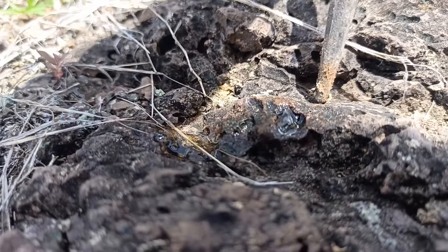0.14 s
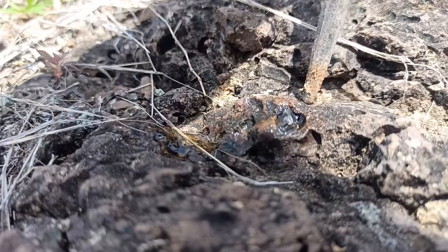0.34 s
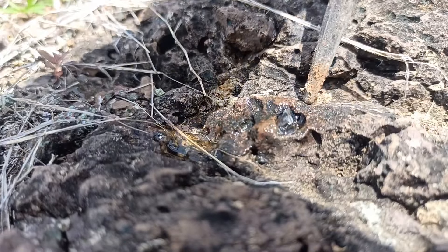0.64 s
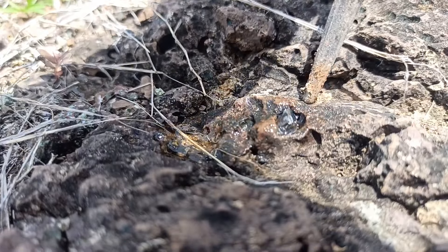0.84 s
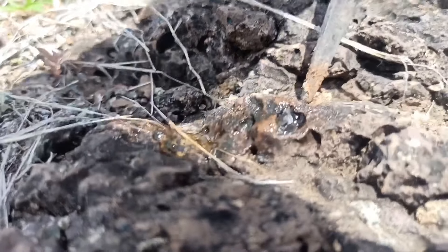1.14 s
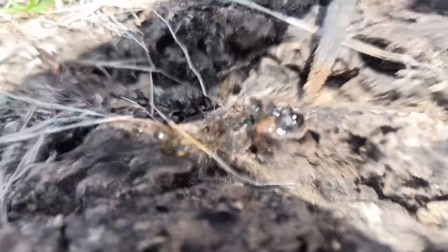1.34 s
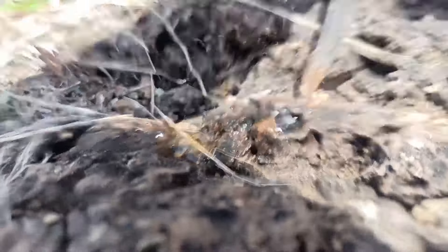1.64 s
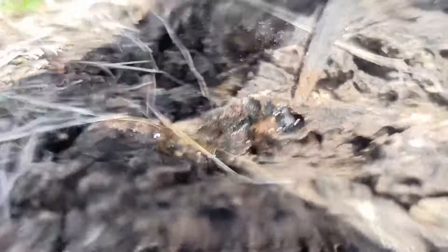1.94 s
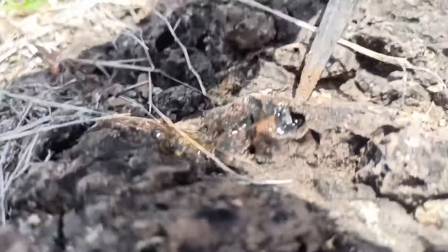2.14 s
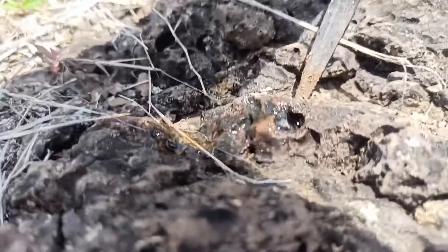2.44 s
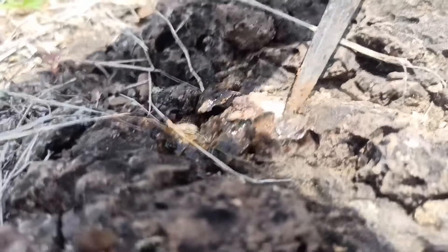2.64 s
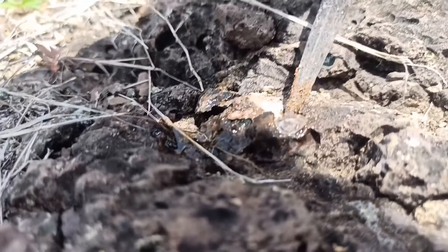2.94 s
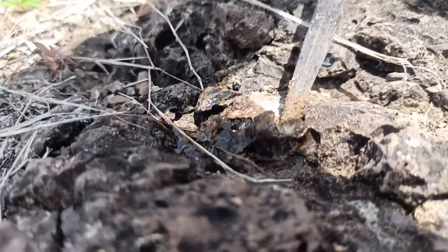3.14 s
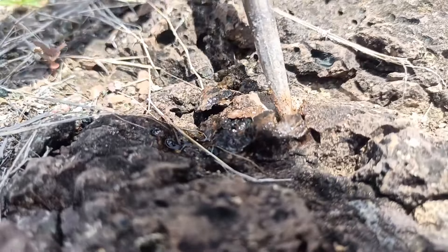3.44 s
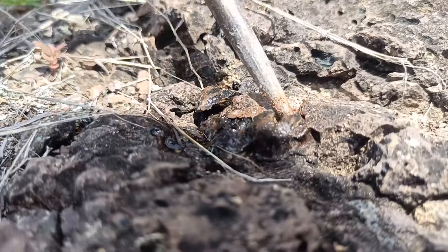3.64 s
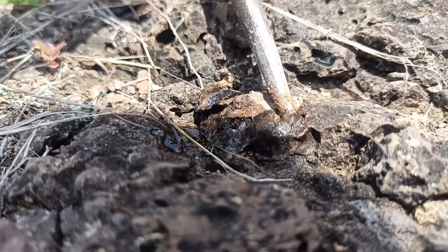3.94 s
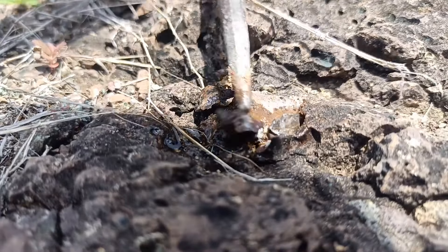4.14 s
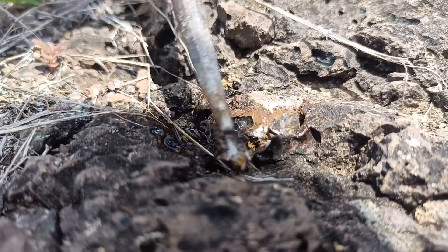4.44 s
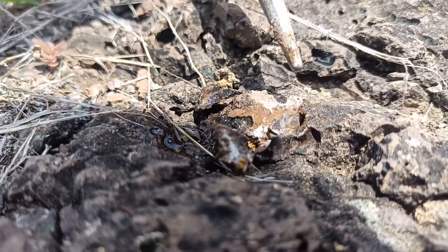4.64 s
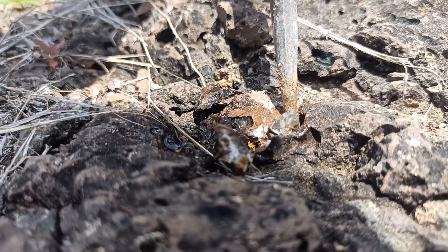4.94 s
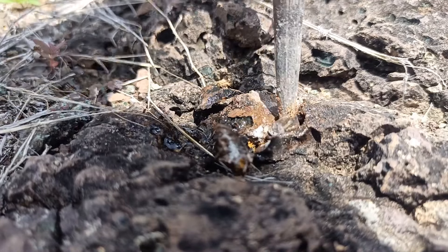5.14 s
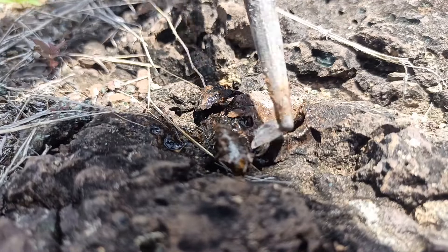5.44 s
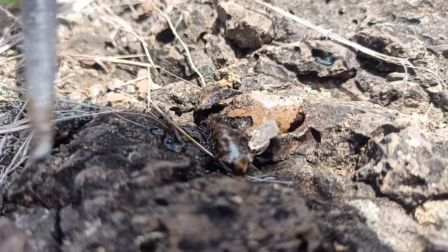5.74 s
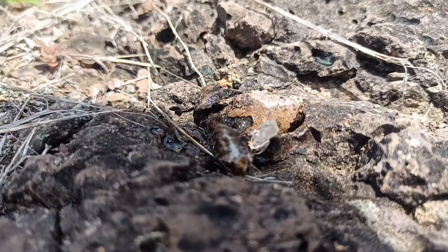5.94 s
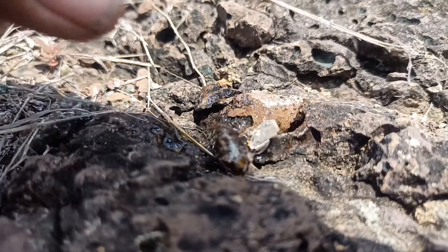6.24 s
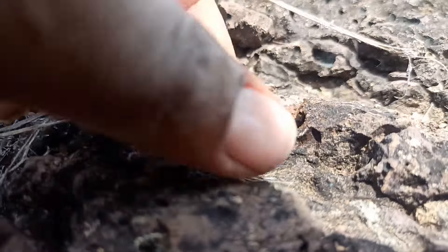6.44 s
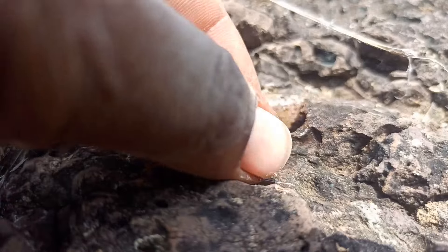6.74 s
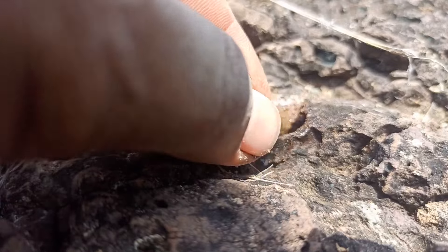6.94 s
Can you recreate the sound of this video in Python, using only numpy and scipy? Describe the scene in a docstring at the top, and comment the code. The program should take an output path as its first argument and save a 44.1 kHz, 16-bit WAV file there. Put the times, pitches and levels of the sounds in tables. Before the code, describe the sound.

Outdoors, spaced hard blows crack crusty rock, then a metal tip scrapes and rings under rumbling wind, ending in gritty finger rubbing.

```python
"""Outdoors: wind buffets mostly the left port over a breeze in dry grass; a steel pick touches volcanic rock.
From 1 s seven sharp blows drive it in: porous rock cracks and thuds, chips tick; a faint hum swells and dies.
From 4 s the tip pries, scrapes and probes, the shaft ringing; a flake clinks; then fingers rub loose grit.
Shaped noise makes wind, crunch and rubbing; damped modes make rock and steel; short pings make crumbs.
Peaks over a ceiling duck the gain for a moment, and the input clips."""
import sys
import numpy as np
from scipy import signal
from scipy.fft import rfft, irfft
from scipy.io import wavfile
from scipy.ndimage import uniform_filter1d, minimum_filter1d

SR = 44100
rng = np.random.default_rng(int(sys.argv[2]) if len(sys.argv) > 2 else 0)


def generate_wav(sig):
    """Save sig (samples, or channels by samples) to the path in sys.argv[1] as 16-bit PCM at SR."""
    pcm = np.round(np.clip(np.atleast_2d(sig).T, -1, 1) * 32767).astype(np.int16)
    wavfile.write(sys.argv[1], SR, pcm)


N = 312669
TIME = np.arange(N) / SR


def undb(db):
    """Decibels to gain."""
    return 10 ** (np.asarray(db) / 20)


def unit(x):
    """Scale to rms 1."""
    return x / np.sqrt(np.mean(x ** 2))


def curve(rows):
    """Each column of a table, joined by lines in time."""
    s, *columns = np.transpose(rows)
    return [np.interp(TIME, s, c) for c in columns]


def response(points, size):
    """Minimum-phase spectrum with the given (f/Hz, level/dB) outline, by folding the cepstrum."""
    hz, db = np.transpose(points)
    f = np.fft.rfftfreq(size, 1 / SR)
    outline_db = np.interp(np.log(f + 1), np.log(hz), db)
    cepstrum = irfft(np.log(undb(outline_db)))
    cepstrum[1:size // 2] *= 2
    cepstrum[size // 2 + 1:] = 0
    return np.exp(rfft(cepstrum))


def through(x, taps):
    """Convolve every channel with an impulse response."""
    return signal.oaconvolve(np.atleast_2d(x), np.atleast_2d(taps), axes=1)[:, :N]


def colour(x, points):
    """Give white sound a spectrum and keep its power."""
    taps = irfft(response(points, size=4096))
    return through(x, taps / np.linalg.norm(taps))


def highpass(x, hz):
    """Second-order low cut."""
    return signal.sosfilt(signal.butter(2, hz, "highpass", fs=SR, output="sos"), x)


def ring(modes):
    """First 0.25 s of the impulse response of damped modes."""
    t = TIME[:SR // 4]
    return sum(undb(db - 60 * t / t60) * np.sin(2 * np.pi * hz * t) for hz, db, t60 in modes)


def resonate(x, peaks, direct):
    """Resonances, with a share of the sound passing straight through."""
    out = direct * x
    for hz, width_hz, db in peaks:
        out = out + undb(db) * signal.lfilter(*signal.iirpeak(hz, hz / width_hz, SR), x)
    return out


def walk(rate_hz):
    """Smooth random wander of rms 1."""
    k = int(SR / rate_hz)
    steps = np.repeat(rng.standard_normal(N // k + 1), k)[:N]
    return unit(uniform_filter1d(uniform_filter1d(steps, k), k // 2))


def noise(shared):
    """White noise at the two ports, a share of its power common to both."""
    common = np.sqrt(shared) * rng.standard_normal(N)
    return common + np.sqrt(1 - shared) * rng.standard_normal((2, N))


def grains(rate_hz, spread_db, shared):
    """Crunching noise: its level wanders quickly, as tiny fractures differ in size."""
    return unit(noise(shared) * undb(spread_db * np.clip(walk(rate_hz), -2, 2)))


def pan(left_db):
    """Gains of the two channels at constant power, left over right in dB."""
    return unit(undb(np.array([[left_db], [-left_db]]) / 2))


def swell(at_s, rise_s, fall_s):
    """Exponential growth up to a moment and decay after it, cut at 12 time constants."""
    ends_s = np.array([at_s - 12 * rise_s, at_s + 12 * fall_s])
    first, last = np.clip(ends_s * SR, 0, N).astype(int)
    t = TIME[first:last] - at_s
    shape = np.zeros(N)
    shape[first:last] = np.exp(-np.maximum(-t / rise_s, t / fall_s))
    return shape


def strike(at_s, modes, detune, scatter_db, push_s):
    """A Gaussian push on a set of modes; each strike detunes and scatters them at random."""
    chance = rng.standard_normal((len(modes), 2))
    tone = ring([(hz * (1 + detune * a), db + scatter_db * b, t60)
                 for (hz, db, t60), (a, b) in zip(modes, chance)])
    push = np.exp(-.5 * (np.arange(-256, 257) / SR / push_s) ** 2)
    tone = signal.oaconvolve(tone, push / push.sum())
    start = int(at_s * SR) - len(push) // 2
    return np.pad(tone, (start, N))[:N]


# wind on the left port, before trims: t/s, level/dB
WIND = [(0.03, -47.5), (0.12, -30.5), (0.47, -31.5), (1.1, -47.5), (1.58, -44), (1.9, -54), (2.65, -41.5),
        (2.87, -30), (3.22, -50.5), (3.42, -33.5), (3.8, -30), (4.4, -38), (4.95, -28.5), (5.2, -40.5),
        (5.62, -43.5), (6.15, -29.5), (6.75, -21.5), (7.09, -23)]
# hardest single buffets, before trims: t/s, level/dB, rise and fall time constant/s
BUFFETS = [(0.287, -14, 0.0087), (3.295, -11, 0.0049), (3.67, -18, 0.0096), (3.99, -21.5, 0.013),
           (4.302, -15, 0.0032), (4.448, -18.5, 0.0044), (4.583, -22.5, 0.018), (4.63, -14, 0.0051),
           (4.742, -16, 0.0051), (4.784, -20, 0.0098), (5.499, -16, 0.012), (6.185, -9.5, 0.0071),
           (6.718, -10, 0.018), (6.984, -7.5, 0.0043), (7.056, -6, 0.0085)]
# spectra of the rumble and of the eddies: f/Hz, level/dB
WIND_COLOUR = [(20, -26.5), (45, -23), (75, 1), (105, 6.5), (160, -3), (250, -15.5), (400, -34.5),
               (700, -47), (1500, -69.5)]
BUFFET_COLOUR = [(25, -35), (60, -7.5), (110, 3.5), (180, 1.5), (290, -8.5), (450, -24), (800, -49),
                 (1600, -66.5)]


def wind(steady_db=-2, buffet_db=-5, kick_db=-4, flutter_db=7.0, right_db=-17, gust_db=-9):
    """Eddies rumble on the ports; stronger flow reaches higher, and each buffet has one sharp kick."""
    flow_db, = curve(WIND)
    flow = undb(flow_db + flutter_db * np.minimum(walk(60), 1.3))
    buffets, kicks = np.zeros((2, N))
    for s, db, length_s in BUFFETS:
        buffets += undb(db + buffet_db) * swell(s, length_s, length_s)
        kicks[int((s - .003) * SR)] += undb(db + kick_db) * np.sqrt(length_s * SR)
    gusts = undb(gust_db) * flow * undb((flow_db + 34.0) / 3)
    rumble = undb(steady_db) * flow * colour(noise(shared=0.013), WIND_COLOUR)
    turbulence = (buffets + gusts) * grains(rate_hz=290, spread_db=4, shared=0.024)
    left_kicks = kicks * np.array([[1], [0]])
    eddies = colour(turbulence + left_kicks, BUFFET_COLOUR)
    return (rumble + eddies) * undb([[0], [right_db]])


# steady hiss; hiss growing with the wind, relative to the wind
BREEZE_DB, BREEZE_WIND_DB = -59.5, -42.5
# louder rustles of the grass: t/s, level/dB
RUSTLES = [(0.03, -58), (2.75, -60.5), (3.4, -53.5)]
RUSTLE_RISE_S, RUSTLE_FALL_S = 0.054, 0.066
# spectrum of the open air: f/Hz, level/dB
AIR_COLOUR = [(25, 11), (100, 14.5), (250, 19), (500, 11), (900, 4.5), (1800, -0.5), (4000, -1.5),
              (7000, -5.5), (8500, -11.5), (10000, -7.5), (12000, -8), (15500, -8.5)]


def breeze():
    """Dry grass hisses as coloured noise, more in stronger wind, with a few rustles."""
    flow_db, = curve(WIND)
    air = undb(BREEZE_DB) + undb(flow_db + BREEZE_WIND_DB)
    for s, db in RUSTLES:
        air += undb(db) * swell(s, RUSTLE_RISE_S, RUSTLE_FALL_S)
    return air * undb(.5 * walk(7.1)) * colour(noise(shared=0.023), AIR_COLOUR)


# tip catching on the rock: t/s, length/s, grit level/dB, stone knock level/dB, pick ring level/dB
TOUCHES = [(0.348, 0.014, -58, -56, -49.5), (0.38, 0.0065, -57, -28.5, -74),
           (0.535, 0.017, -52.5, -70, -85), (4.079, 0.0082, -36.5, -47, -55),
           (4.097, .009, -41.5, -49, -43), (4.127, 0.024, -46.5, -56, -51.5),
           (4.136, 0.0033, -38.5, -41.5, -57), (4.802, 0.012, -42.5, -39, -50.5),
           (4.818, 0.0062, -38, -62, -50.5), (4.834, 0.0047, -38, -23, -68),
           (5.008, 0.0073, -39.5, -41.5, -50), (5.033, .011, -36.5, -47, -35.5),
           (5.069, 0.018, -42, -38, -76), (5.474, 0.0063, -57.5, -63, -44),
           (5.737, 0.013, -42.5, -34.5, -35.5), (5.903, 0.016, -45, -41, -80),
           (6.009, 0.018, -55, -69.5, -27), (6.046, 0.15, -55, -50, -36.5),
           (6.112, 0.0032, -21, -14, -30.5), (6.136, 0.015, -39.5, -31, -64)]
# each catch skips once and lands again, more softly
SKIP_S, SKIP_DB = 0.0153, -14
# light probing scratches: start t/s, length/s, grit level/dB
PROBING = [(4.182, .07, -62), (4.426, .06, -64.5), (5.146, .3, -58), (6.161, .12, -51)]
SCRATCH_GAP_S, SCRATCH_S, SCRATCH_SCATTER_DB = 0.044, 0.015, 2.5
SCRATCH_STONE_DB, SCRATCH_RING_DB = -4.5, 0.5  # relative to the grit
# small chips and crumbs that tick or snap: t/s, grit level/dB, stone knock level/dB
CHIPS = [(1.397, -31.5, -43.5), (2.001, -31, -57), (2.015, -40, -69), (2.299, -29, -56), (2.643, -41, -70),
         (2.707, -49, -48.5), (2.79, -57, -62), (5.358, -48.5, -66), (6.351, -47, -31), (6.574, -41, -48),
         (6.609, -34, -48), (6.683, -41, -22), (6.848, -44, -19), (6.878, -29, -57), (6.902, -50, -50),
         (6.966, -32.5, -27.5), (6.976, -44, -16), (7.053, -50.5, -29.5)]
CHIP_S = 0.0045


def contacts():
    """Every contact as (t/s, length/s, grit, stone, ring gains): catches and skips, scratches, chips."""
    rows = []
    for s, length_s, *db in TOUCHES:
        rows.append((s, length_s, *undb(db)))
        rows.append((s + SKIP_S, length_s, *undb(db) * undb(SKIP_DB)))
    for start_s, length_s, db in PROBING:
        times = np.arange(start_s, start_s + length_s, SCRATCH_GAP_S)
        for s, (late, size) in zip(times, rng.standard_normal((32, 2))):
            grit_gain = undb(db + SCRATCH_SCATTER_DB * size)
            gains = grit_gain * undb([0, SCRATCH_STONE_DB, SCRATCH_RING_DB])
            rows.append((s + 0.26 * SCRATCH_GAP_S * late, SCRATCH_S, *gains))
    for s, grit_db, stone_db in CHIPS:
        rows.append((s, CHIP_S, undb(grit_db), undb(stone_db), 0))
    return rows


# tip chattering as it scrapes: f/Hz, width/Hz, level/dB
SCRAPE_PEAKS = [(1486, 180, -3.5), (1890, 65, -7.5), (4680, 110, 6)]
# pick ringing freely: f/Hz, level/dB, t60/s
PICK_MODES = [(2648, -24, 0.16), (4833, -12, 0.042), (4706, -7, 0.093), (7330, -5, .03),
              (7337, -8.5, 0.054), (7420, -13.5, 0.14), (10470, -9.5, 0.027), (11950, -18, 0.044),
              (14000, -12, 0.033), (14600, -17, 0.11)]
# spectra of grit and of knocked stone: f/Hz, level/dB
GRIT_COLOUR = [(250, -8.5), (700, -3.5), (1500, 6.5), (3000, 4), (5000, 3.5), (7500, -2), (12000, -7.5),
               (15500, -8.5)]
STONE_COLOUR = [(90, -7), (220, 7), (400, 6.5), (650, -4.5), (1000, -10), (2000, -33)]


def touches(grit_db=2, stone_db=1, ring_db=-2, impact_db=17, fade=0.66, bite=0.22,
            slowest_bite_s=0.011, travel_s=0.16):
    """The tip catches and slips: grit crunches, the stone knocks and the steel shaft rings."""
    grit, stone, steel, impacts = np.zeros((4, N))
    for s, length_s, grit_gain, stone_gain, ring_gain in contacts():
        rise_s = min(bite * length_s, slowest_bite_s)
        contact = swell(s + 0.00032 + rise_s, rise_s, fade * length_s)
        contact *= np.clip((s + travel_s - TIME) / 0.067, 0, 1)  # the tip soon runs out of travel
        grit += grit_gain * contact
        stone += stone_gain * contact
        impacts[int((s + rise_s) * SR)] += stone_gain * undb(impact_db)  # one solid push
        # a brief contact must push harder for the same ring
        steel += ring_gain * contact * np.sqrt(1 + 0.022 / length_s)
    shaft = ring(PICK_MODES)
    steel *= unit(undb(2.2 * walk(70)))  # sticking and slipping makes the ring stutter
    slips = unit(resonate(grains(rate_hz=650, spread_db=5, shared=0.043), SCRAPE_PEAKS, direct=0.89))
    crunch = colour(grit * slips, GRIT_COLOUR)
    knock = colour(stone * noise(shared=0.25) + impacts, STONE_COLOUR)
    rubbed_steel = steel * grains(rate_hz=260, spread_db=2.5, shared=0.16)
    rings = through(rubbed_steel, shaft / np.linalg.norm(shaft))
    rock = pan(left_db=1.0) * (undb(grit_db) * crunch + undb(stone_db) * knock)
    return rock + pan(left_db=9.5) * undb(ring_db) * rings


# blows on the pick: t/s, crack level/dB, splinter level/dB, thud level/dB, knock level/dB, crush decay/s
BLOWS = [(1.0250, 1, -9, -4.5, -9, 0.0014), (1.3602, -8, -19, -6, -2.5, 0.0018),
         (1.6711, -0.5, -3.5, -5, -8.5, 0.0015), (1.9729, -1.5, -3, -3.5, -12.5, 0.0018),
         (2.2690, 0, -1.5, -1, -5, 0.0023), (2.5590, 1.5, -0.5, -1, -11, 0.0019),
         (3.1464, -9.5, -14.5, -27, -24, 0.001)]
# rock mass and stone around the tip: f/Hz, level/dB, t60/s
THUD_MODES = [(117, -1, .042), (163, -2.5, 0.055), (256, -3, 0.04)]
KNOCK_MODES = [(426, 2, .03), (595, -6.5, 0.019), (700, -8, 0.0041), (907, -7, .022), (1300, -7.5, 0.008)]
# crust being split off: f/Hz, level/dB, t60/s
CRUST_MODES = [(500, -33, 0.13)]
CRUST_LOSS_DB = -4  # with each blow
# pick pressed into the rock: f/Hz, width/Hz, level/dB
PRESSED_PICK = [(1780, 280, -4), (2125, 56, -7), (3190, 84, 1), (3556, 380, -2), (4560, 160, 3),
                (6180, 130, 6), (7480, 27, 6), (12640, 260, -3.5)]
# spectra of crack and splinters: f/Hz, level/dB
CRACK_COLOUR = [(200, -20), (600, 0.5), (1200, 3), (3000, 1), (4700, -0.5), (6500, -5), (9000, -16.5),
                (15500, -24)]
SPLINTER_COLOUR = [(3500, -27), (5500, -11), (6500, 7.5), (8000, -0.5), (12000, -3.5), (15500, -8)]


def blows(lead_in_db=-18, lead_in_s=0.0053, tail_db=-33, tail_s=.013, crack_db=-2, splinter_db=-5,
          shudder_db=-15, shudder_s=0.012, body_db=2, rebound_s=0.02, rebound_db=-23, retap_db=-22,
          lowest_hz=75):
    """A short resonant swell leads into each blow; pores crack, the rock thuds, the pick rebounds once."""
    crush, splinters, lead_in, shudder, body = np.zeros((5, N))
    for number, (s, crack, splinter, thud, knock, length_s) in enumerate(BLOWS):
        burst = swell(s, 0.61 * length_s, length_s) + undb(tail_db) * swell(s, length_s, tail_s)
        retap = undb(knock + retap_db) * swell(s + rebound_s, .0003, length_s)
        crush += undb(crack) * burst + retap
        splinters += undb(splinter) * burst
        # a longer crush has a louder swell before it
        lead_in_gain = undb((crack + splinter) / 2 + lead_in_db) * length_s / 0.0017
        lead_in += lead_in_gain * swell(s, lead_in_s, length_s) * (TIME > s - 3 * lead_in_s)
        shudder += undb(knock + shudder_db) * swell(s, 0.0048, shudder_s)
        body -= undb(thud) * strike(s + 0.0022, THUD_MODES, detune=0.021, scatter_db=2, push_s=0.00034)
        body -= undb(knock) * strike(s - .0008, KNOCK_MODES, detune=0.018, scatter_db=0, push_s=.00008)
        crust = strike(s, CRUST_MODES, detune=.02, scatter_db=0, push_s=.00008)
        body += undb(number * CRUST_LOSS_DB) * crust
    body += undb(rebound_db) * np.roll(body, int(rebound_s * SR))
    body = highpass(body, lowest_hz)  # a small rock radiates no deep bass
    fracture = unit(resonate(grains(rate_hz=2500, spread_db=1.0, shared=0), PRESSED_PICK, direct=0.88))
    resonance = unit(resonate(noise(shared=0.058), PRESSED_PICK, direct=0))
    cracks = undb(crack_db) * colour(fracture * crush, CRACK_COLOUR)
    cracks += undb(splinter_db) * colour(fracture * splinters, SPLINTER_COLOUR)
    shudders = colour(shudder * noise(shared=0.61), STONE_COLOUR)
    return cracks + resonance * lead_in + undb(body_db) * body + shudders


HUM_HZ, HUM_DB, HUM_PEAK_S, HUM_RISE_S, HUM_FALL_S = 446, -56.5, 3.62, 0.49, .08


def hum(octave_db=-15):
    """A faint tone and its octave, wavering in pitch and level, swell and die away."""
    hz = HUM_HZ * (1 + 0.017 * walk(40) + 0.014 * walk(4))
    phase = 2 * np.pi * np.cumsum(hz) / SR
    level = undb(HUM_DB + 2.7 * walk(40)) * swell(HUM_PEAK_S, HUM_RISE_S, HUM_FALL_S)
    return level * (np.sin(phase) + undb(octave_db) * np.sin(2 * phase))


FLAKE_S, FLAKE_DB = 5.737, -48
# loosened flake: f/Hz, level/dB, t60/s
FLAKE_MODES = [(1045, -1.5, 0.44), (2650, -1.5, 0.098)]


def flake():
    """A loosened flake of rock clinks once, its modes set ringing by a very short push."""
    clink = strike(FLAKE_S, FLAKE_MODES, detune=0, scatter_db=2.0, push_s=.00002)
    return pan(left_db=19) * undb(FLAKE_DB) * clink


RUB_ATTACK, RUB_RELEASE = 0.26, 0.15  # shares of the length of a stroke
RUB_FIRST_TOUCH_DB = -11.5


def stroke(start_s, length_s):
    """Pressure of one finger stroke: it touches, bears down, holds and lets go."""
    progress = (TIME - start_s) / length_s
    bearing = undb(RUB_FIRST_TOUCH_DB * np.clip(1 - progress / RUB_ATTACK, 0, 1))
    return (progress > 0) * bearing * np.exp(-np.clip((progress - 1) / RUB_RELEASE, 0, 20))


def crumbs(start_s, count, low_hz, high_hz, cycles, spread_db):
    """Crumbs snap and roll from a moment on: each a brief ping with its own pitch, size and side."""
    out, t = np.zeros((2, N + 512)), np.arange(512) / SR
    first = start_s * SR
    for when, pitch, size, side in rng.random((count, 4)):
        hz = low_hz * (high_hz / low_hz) ** pitch
        i = int(first + when * (N - first))
        ping = np.sin(2 * np.pi * hz * t) * np.exp(-hz * t / cycles) * np.sqrt(hz)
        sides = [np.cos(np.pi * side), np.sin(np.pi * side)]
        out[:, i:i + len(t)] += undb(-spread_db * np.log(size + .02)) * np.outer(sides, ping)
    return out[:, :N] / np.sqrt(np.mean(out[:, int(first):N] ** 2))


# finger strokes: start t/s, length/s, coarse crumbs level/dB, fine sand level/dB, stone rumble level/dB
RUB = [(6.347, .37, -43.5, -42.5, -37), (6.807, 0.11, -46, -38, -38.5), (6.957, .075, -65.5, -54, -38.5)]
# spectra of crumbs and sand: f/Hz, level/dB
RUB_COLOUR = [(150, -5), (400, 6.5), (800, 8.5), (1300, -1.5), (2200, 8.5), (4000, -0.5), (6000, -4),
              (15000, -23)]
SAND_COLOUR = [(2500, -5.5), (5000, 3), (6600, 7), (8000, 0), (10000, 0.5), (15500, -9.5)]


def fingers(coarse_db=0, sand_db=-1, crumb_db=-2, surge_db=2.0, judder_db=4):
    """Skin drags crumbs and sand in uneven surges, nearer the right port; the stone judders, more left."""
    pushes = sum(np.outer(undb(db), stroke(s, length_s)) for s, length_s, *db in RUB)
    coarse_push, sand_push, stone_push = pushes * undb(surge_db * walk(35))
    rolling = crumbs(RUB[0][0], count=1850, low_hz=400, high_hz=8000, cycles=6, spread_db=3.5)
    dragging = undb(crumb_db) * rolling + grains(rate_hz=620, spread_db=1.5, shared=0.13)
    coarse = colour(coarse_push * dragging, RUB_COLOUR)
    sand_grains = grains(rate_hz=1200, spread_db=4.5, shared=0.034)
    sand = colour(sand_push * undb(2 * walk(98)) * sand_grains, SAND_COLOUR)
    judder = colour(stone_push * grains(rate_hz=120, spread_db=judder_db, shared=0.14), STONE_COLOUR)
    grit = undb(coarse_db) * pan(left_db=-2.5) * coarse + undb(sand_db) * pan(left_db=-14.0) * sand
    return grit + pan(left_db=11) * judder


def scene(blow_db=3):
    """All sources at the two ports; the blows overload the input."""
    return wind() + breeze() + touches() + undb(blow_db) * blows() + hum() + flake() + fingers()


# overall colour of the sound, with a hollow near 10 kHz: f/Hz, level/dB
OVERALL_COLOUR = [(4400, 0.5), (5100, -3.5), (5800, -3), (6400, 7), (8300, 7), (9000, -7.5), (11000, -16.5),
                  (11800, 0.5), (15000, 3)]
TOP_HZ = 15700


def record(dry, ceiling=1.08, hold_s=0.037, release_s=0.042, low_cut_hz=48):
    """Overall colour, low cut, gain control that holds and then recovers, clipping and top cut."""
    x = through(dry, irfft(response(OVERALL_COLOUR, size=2048)))
    x = highpass(x, low_cut_hz)
    excess = np.log(np.maximum(np.abs(x).max(axis=0) / ceiling, 1))
    half = int(hold_s * SR / 2)
    excess = -minimum_filter1d(-excess, 2 * half + 1, origin=half)  # each peak is held for a while
    leak = np.exp(-TIME / release_s)
    held = np.maximum.accumulate(excess / leak) * leak  # and then leaks away
    gain = np.exp(-uniform_filter1d(held, SR // 300))  # centred smoothing looks slightly ahead
    x = np.clip(x * gain, -.92, .92)
    return signal.sosfilt(signal.ellip(10, .2, 90, TOP_HZ, fs=SR, output="sos"), x)


dry = scene()
out = record(dry)
generate_wav(out)
```